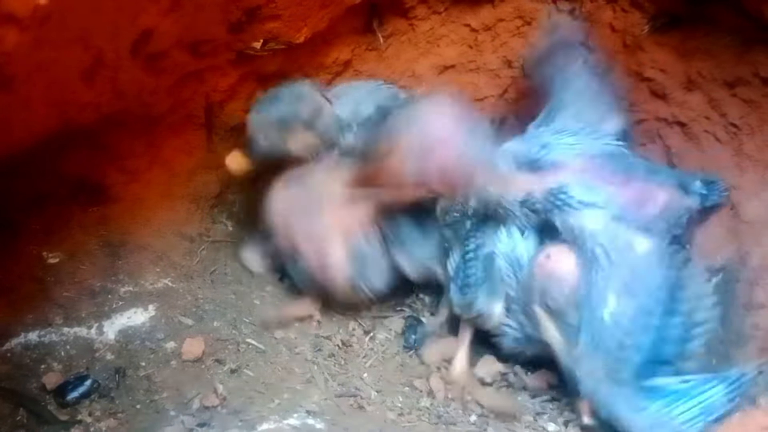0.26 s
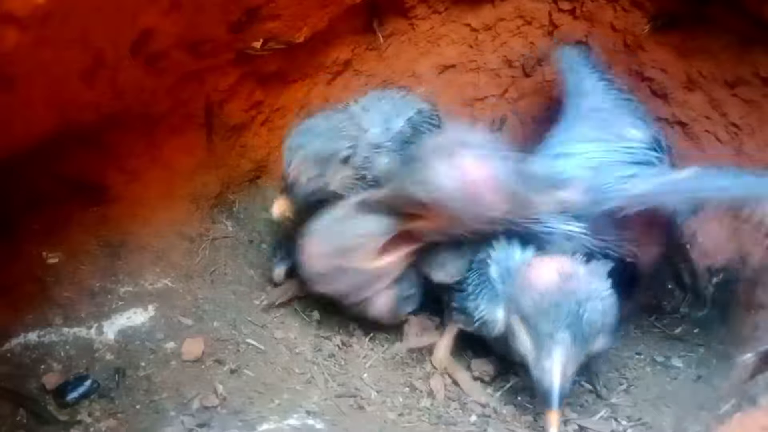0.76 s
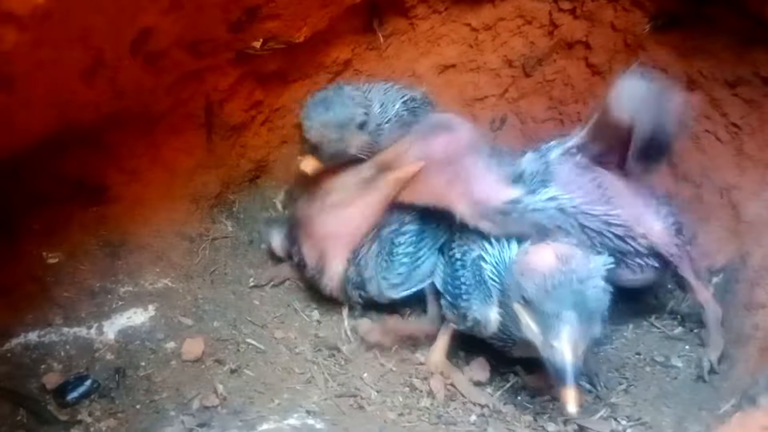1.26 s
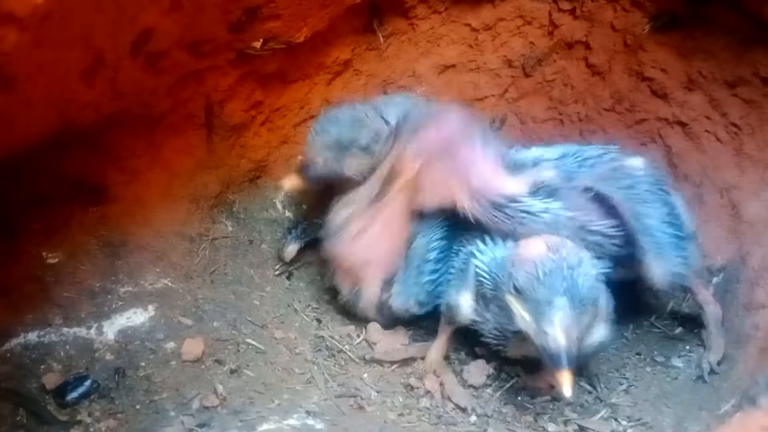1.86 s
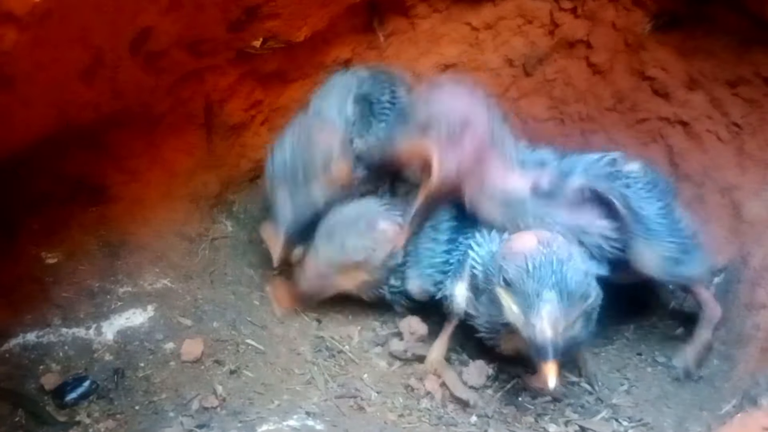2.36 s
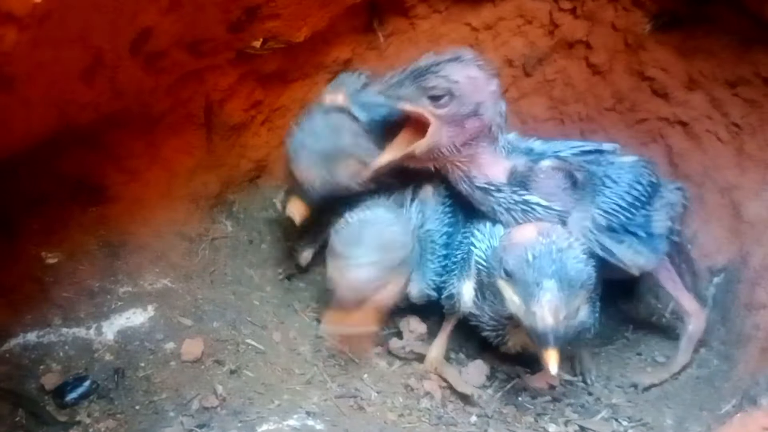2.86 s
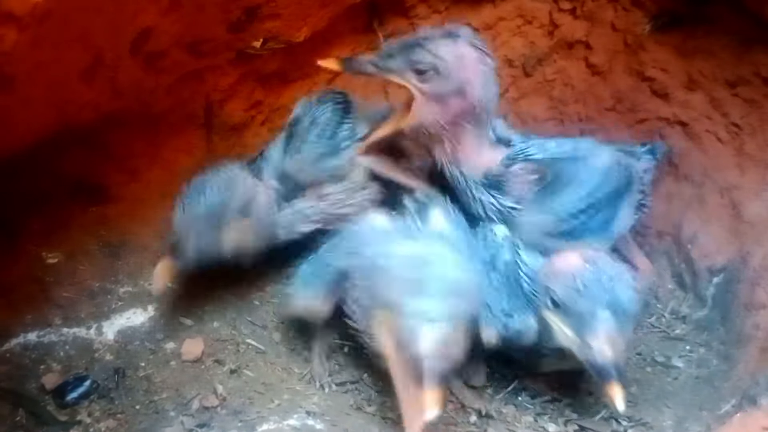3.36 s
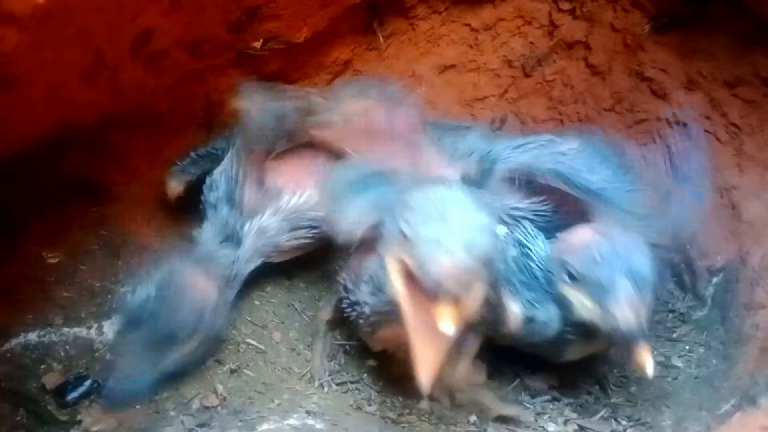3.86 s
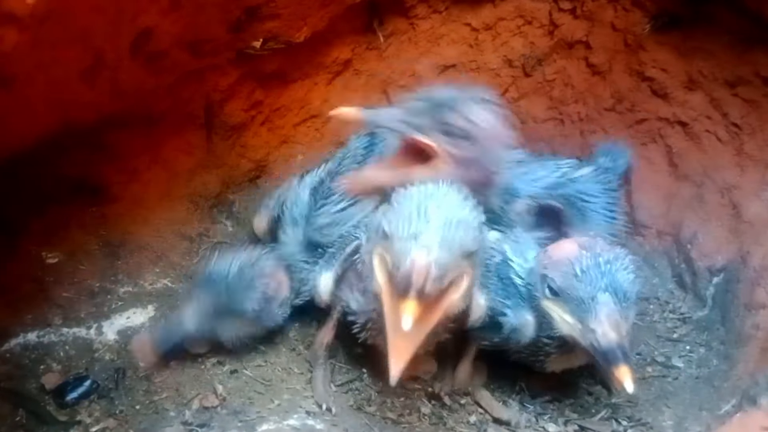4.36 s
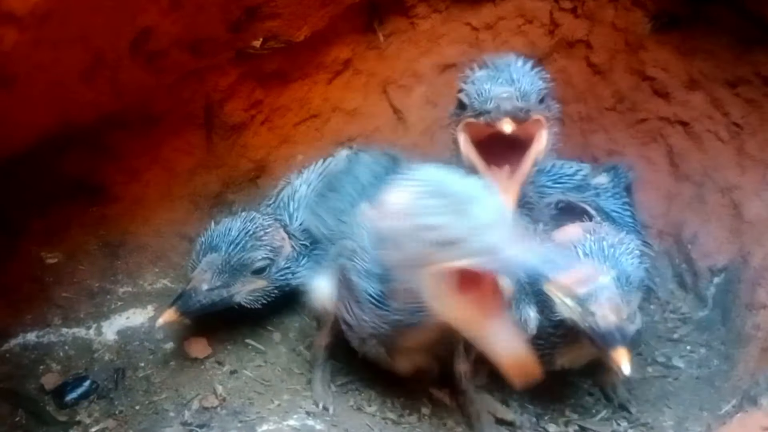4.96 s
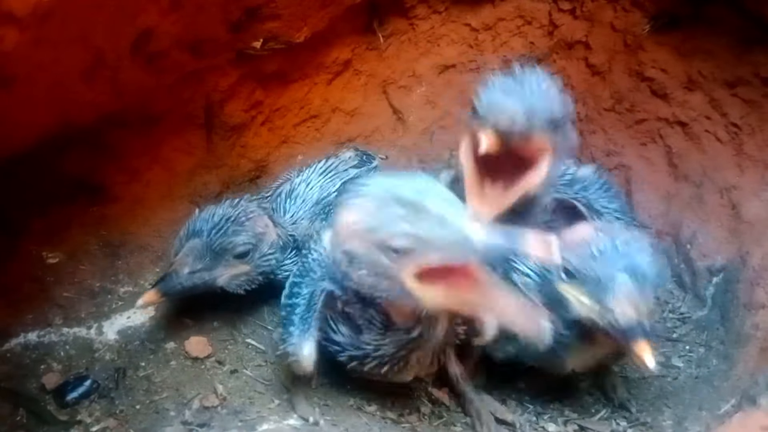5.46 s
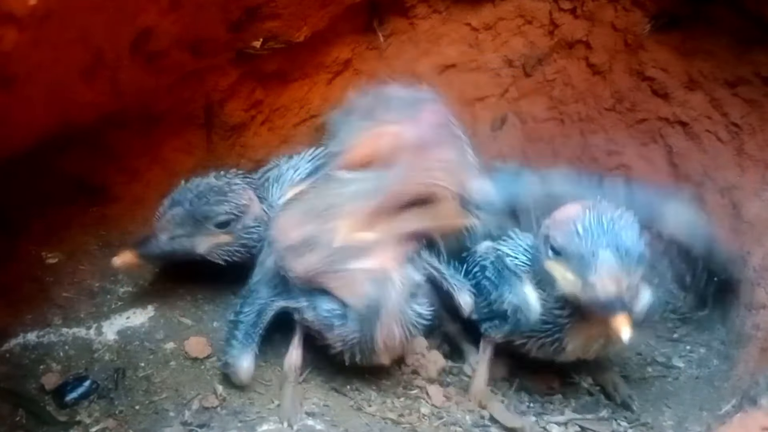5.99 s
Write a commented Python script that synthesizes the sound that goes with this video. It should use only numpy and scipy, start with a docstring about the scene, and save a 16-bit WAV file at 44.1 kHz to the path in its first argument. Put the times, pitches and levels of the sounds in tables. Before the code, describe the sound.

A close microphone in a dry little earth hollow catches jostling nestlings calling without rest, about three calls per second. Every call scoops up quickly to a high, buzzy whistle, wavers, and drops off abruptly. Some are cleaner and louder, others break into rasping, two-toned screeches around the middle and at the end. Very faint low rustling lies beneath; there is hardly any bass or reverberation.

```python
"""In an earthen burrow nestlings beg at close range: twenty harsh calls with short pauses between them.
In each call the syrinx, a self-oscillating valve, whistles near 3 kHz and breaks in and out of chaotic flutter.
Air forced past it is turbulent: it rasps in the resonances of throat and mouth and hisses in those of the beak.
The soft walls add only a few early echoes and a very short tail; a faint low rustle lies under the calls."""
import sys
import numpy as np
from scipy import signal
from scipy.fft import rfft, irfft
from scipy.io import wavfile
from scipy.ndimage import uniform_filter1d, map_coordinates

SR = 44100
rng = np.random.default_rng(int(sys.argv[2]) if len(sys.argv) > 2 else 0)


def digitize_waveform(pressure):
    """Quantize a signal to 16-bit integers and store it at the path in sys.argv[1].

    Rows of a 2-D input are taken as channels; values are limited to [-1, 1].
    """
    field = np.atleast_2d(pressure).T
    bounded = np.clip(field, -1, 1)
    quanta = np.round(bounded * 32767).astype(np.int16)
    wavfile.write(sys.argv[1], SR, quanta)


N = 274743

# higher resonances of windpipe and mouth: centre_hz, width_hz (of one pass), relative_level_db
MOUTH_MODES = [(1964, 332, 7), (2328, 98, 9), (3100, 298, 11), (3380, 170, -0.5), (4250, 1100, 2)]


def undb(db):
    """Amplitude gain is ten to the power of the decibels over twenty."""
    return 10 ** (np.asarray(db) / 20)


def unit(x):
    """Normalization: the mean power becomes 1."""
    return x / np.sqrt(np.mean(np.abs(x) ** 2))


def wander(count, hz):
    """Low-pass noise: random motion with a spread of 1, mostly slower than hz; count is at most one second."""
    f = np.fft.rfftfreq(SR, 1 / SR)
    # the Gaussian leaves nothing much faster
    shape = np.exp(-(f / hz / 4) ** 2) / (1 + (f / hz) ** 2)
    return unit(irfft(rfft(rng.standard_normal(SR)) * shape, SR))[:count]


def high_pass(x, hz):
    """Fourth-order Butterworth filter: steep loss below the corner."""
    return signal.sosfilt(signal.butter(4, hz, "high", fs=SR, output="sos"), x)


def add(out, sound, start_s):
    """Superposition: mix a sound in at a time."""
    start = max(int(start_s * SR), 0)
    out[start:start + len(sound)] += sound[:N - start]


def rustle(birds, rustle_db=-61, floor_db=-91, corner_hz=200):
    """Band-limited noise: a faint low rustle follows the rms of the calls, over a very quiet background."""
    effort = np.sqrt(np.abs(uniform_filter1d(birds ** 2, size=2000)))
    band = signal.butter(1, [corner_hz / 2, corner_hz * 2], "band", fs=SR, output="sos")
    noise = unit(signal.sosfilt(band, rng.standard_normal(N)))
    return noise * (undb(rustle_db) * effort + undb(floor_db))


def burrow(x, t60_s=0.058, wet_db=-33, count=4096):
    """Reverberation by convolution with decaying noise: bare earth swallows the sound almost at once."""
    decay = undb(-60 * np.arange(count) / SR / t60_s)
    tail = unit(rng.standard_normal(count) * decay) / np.sqrt(count)
    return x + undb(wet_db) * signal.fftconvolve(x, tail)[:N]


def walls(x, echo=0.53, nearest_s=0.000615, farthest_s=.004, sway_s=.00003, count=3):
    """Comb filtering: early echoes off earth and siblings interfere differently as the head moves."""
    n, out = np.arange(len(x)), x
    for lag_s in rng.uniform(nearest_s, farthest_s, count):
        moving_lag_s = lag_s + sway_s * wander(len(x), 3.9)
        out = out + echo * map_coordinates(x, [n - SR * moving_lag_s], order=3)
    return out / np.sqrt(1 + count * echo ** 2)


def resonate(x, modes, lowest_hz=480):
    """Parallel resonances, each applied twice so that the valleys stay dark; the small beak radiates few lows."""
    f = np.fft.rfftfreq(SR, 1 / SR) + 1e-3  # kept off zero for the divisions
    power = 0
    for hz, width_hz, db in modes:
        detuning = (f * f - hz * hz) / (f * width_hz)
        power = power + undb(db) ** 2 / (1 + detuning ** 2) ** 2
    radiation = 1 / np.sqrt(1 + (lowest_hz / f) ** 6)
    return irfft(rfft(x, SR) * np.sqrt(power) * radiation, SR)[:len(x)]


def catch(gain_db, count=512):
    """Impulsive excitation: the throat snaps shut with a crack in the mouth resonances and a faint dull thud."""
    t = np.arange(count) / SR
    crack = resonate(rng.standard_normal(count), MOUTH_MODES) * np.exp(-t / .002)
    thud = .06 * np.exp(-t / .0006)
    return undb(gain_db) * (2 * crack + thud)


def gullet(length_s, hz, gain_db, width_hz=160):
    """Noise-driven resonance: air rasps in the deep cavity while the gullet opens and closes."""
    count = int(length_s * SR)
    noise = unit(resonate(rng.standard_normal(count), [(hz, width_hz, 0)]))
    return noise * np.hanning(count) * undb(gain_db)


def stretch(x, ratio):
    """Time warping: a moving read speed slides all resonances of a noise by the same ratio."""
    return map_coordinates(x, [np.cumsum(ratio)], order=3, mode="mirror")


def turbulence(flow, modes, shift, uneven_db=2.5, uneven_hz=7):
    """Puffs of turbulent air ring sliding resonances; each waxes and wanes as the neck moves."""
    count = len(flow)
    air = 0
    for mode in modes:
        gain = undb(uneven_db * wander(count, uneven_hz))
        air = air + gain * resonate(flow * rng.standard_normal(count), [mode])
    return unit(stretch(air, shift))


def throat_rasp(flow, lowest_db, second_db):
    """Low formants: turbulence rings the two low resonances of the throat."""
    # the two low resonances: centre_hz, width_hz (of one pass)
    throat_modes = [(825, 122), (1350, 103)]
    air = 0
    for mode, db in zip(throat_modes, (lowest_db, second_db)):
        shift = 1 + .025 * wander(len(flow), 9)
        air = air + turbulence(flow, [(*mode, 0)], shift) * undb(db)
    return air


def mouth_rasp(flow):
    """Higher formants: turbulence rings the resonances of windpipe and mouth."""
    return turbulence(flow, MOUTH_MODES, 1 + .014 * wander(len(flow), 9.0))


def beak_hiss(flow, hz):
    """Cavity tuning: the beak gapes wider for a higher pitch, which lifts its resonances."""
    # resonances of the open beak: centre_hz, width_hz (of one pass), relative_level_db
    beak_modes = [(5172, 290, 3.5), (5746, 250, -2.5), (7000, 610, -0.5), (7480, 500, 0), (8110, 300, -3),
                  (8686, 720, -2.5), (9690, 460, -9.5), (12800, 1300, -33)]
    return turbulence(flow, beak_modes, (hz / np.mean(hz)) ** .5, uneven_db=3.0, uneven_hz=9)


def thin_band(x, depth, centre_hz=4900, width_hz=500):
    """Band-stop filter: thins the sound around a centre frequency, by a depth that changes over time."""
    f = np.fft.rfftfreq(SR, 1 / SR)
    band = np.exp(-((f - centre_hz) / width_hz) ** 4)
    return x - depth * irfft(rfft(x, SR) * band, SR)[:len(x)]


def swell(since, left, attack_s, release_s):
    """Linear envelope: pressure builds at the start of a call and drops at its end."""
    return np.clip(since / attack_s, 0, 1) * np.clip(left / release_s, 0, 1)


def wobble(t):
    """Modulation by smooth bumps: the voice of a jostled chick bends in pitch and level and recovers."""
    # wobbles: centre_s, length_s, pitch_bend_hz, whistle_change_db, hiss_change_db
    wobbles = [(0.049, 0.057, -44.5, -4.5, -1.5), (0.136, 0.048, 32, 4, 0.5), (0.292, 0.097, -16.5, 8.5, 7),
               (0.357, 0.0896, 45.5, 7.5, 2.5), (0.636, 0.075, -80.0, -9, 0.5), (0.706, 0.11, 191, 4.5, -4),
               (1.065, 0.055, -220.0, -4, -3.5), (1.091, 0.029, 79, 5, -5), (1.147, 0.16, -91.5, 3.0, -1.5),
               (1.414, 0.0767, 88, -9.5, 10), (1.606, 0.1256, -48, 6, 2.0), (1.817, 0.13, -190.0, 2.0, 2.5),
               (2.183, 0.0926, 100.0, 5, 5.5), (2.26, 0.09, -200.0, 4.5, -7),
               (2.495, 0.0334, 183, 1.0, -1.0), (2.554, 0.05, -350.0, -6.5, -1.5),
               (2.577, 0.05, 265.5, -0.5, -3.0), (2.729, 0.0407, 209, 1.0, 3.5),
               (2.913, 0.045, -300.0, -11, -2.5), (3.114, 0.0617, 68.5, -6.5, -2.5),
               (3.187, 0.12, -160.0, 7.0, -6), (3.475, 0.0474, -160.0, -6.0, 2.5),
               (3.502, 0.0356, 184, 2, -4), (3.72, 0.029, 69.5, 4, -1.5), (3.765, 0.135, -240.0, 0, -3),
               (3.79, 0.024, 41, 6.5, -4), (3.845, 0.03, -200.0, 10.5, -6.5), (3.955, 0.022, 76, 12.5, -5),
               (4.186, 0.097, 20.5, -7, 0), (4.439, 0.053, -250, -3.5, -3),
               (4.698, 0.0452, -220, -3.5, -1.5), (5.211, 0.0958, -140.0, 0.5, -5),
               (5.937, 0.048, 22, 3.5, 4.5), (6.015, 0.11, -160, -12.5, 2)]
    centre_s, length_s, *changes = np.transpose(wobbles)
    position = (t - centre_s[:, None]) / length_s[:, None]
    bumps = np.cos(np.pi * np.clip(position, -.5, .5)) ** 2
    return np.array(changes) @ bumps


def second_voice(t):
    """Two-source voice: in a screech the other side of the syrinx swells and fades; gives its share and pitch."""
    # screeches: start_s, end_s, pitch_hz
    screeches = [(3.128, 3.165, 3745), (3.795, 3.836, 3540), (3.864, 3.949, 3447), (6.062, 6.17, 3550)]
    share, hz = np.zeros(len(t)), np.zeros(len(t))
    for start_s, end_s, pitch_hz in screeches:
        inside = (t > start_s) & (t < end_s)
        share += inside * np.abs(np.sin(np.pi * (t - start_s) / (end_s - start_s))) ** .5
        hz += inside * pitch_hz
    return share, hz


def phasor(hz, jitter_hz, quiver_hz):
    """Frequency modulation: a rotating vector whose pitch quivers at random."""
    quivering_hz = hz + jitter_hz * wander(len(hz), quiver_hz)
    return np.exp(2j * np.pi * np.cumsum(quivering_hz) / SR)


def syrinx(hz, rough, chaos_hz=380, squeeze=0.024):
    """Self-oscillation as a rotating vector: growing roughness breaks the whistle into chaotic flutter."""
    count = len(hz)
    share = np.clip(1.15 * rough, .05, 1)
    chaos = (wander(count, chaos_hz) + 1j * wander(count, chaos_hz)) / np.sqrt(2)
    swing = np.sqrt(1 - share) + np.sqrt(share) * chaos
    # the membranes can only swing so far
    swing = unit(swing / np.sqrt(1 + squeeze * np.abs(swing) ** 2))
    return swing * phasor(hz, jitter_hz=55.0, quiver_hz=155.6)


def puffs(swing, chop=0.51, rattle_db=2.0, rattle_hz=170):
    """Valve-modulated flow: air escapes once a membrane cycle, in the uneven spurts of a fast rattle."""
    return np.maximum(1 + chop * swing.real, 0) * undb(rattle_db * wander(len(swing), rattle_hz))


def call(start_s, end_s, pitch_hz, rise_hz, whistle_db, rise_db, roughness, air_db, air_rise_db, rasp_db,
         lowest_db, second_db, scoop_hz=400, fall_hz=900, hiss_trim_db=-3, rasp_trim_db=1.0, rough_rasp_db=9,
         throat_trim_db=-1, octave_db=-3.0):
    """Source and filter: the syrinx gives whistle and octave, and its air puffs drive throat, mouth and beak."""
    t = np.arange(int(start_s * SR), int(end_s * SR)) / SR
    count = len(t)
    # the first call is already under way and the last one goes on: a second added skips onset or ending
    since = t - t[0] + (start_s < .1)
    left = t[-1] - t + (end_s > N / SR - .1)

    # pitch and levels ramp through the call, bent by the wobbles
    along = np.linspace(-.5, .5, count)
    bend_hz, change_db, hiss_change_db = wobble(t)
    push_db = rise_db * along + change_db
    # the pitch is never quite steady
    hz = pitch_hz + rise_hz * along + bend_hz + 22.35 * wander(count, 14.1)
    # the whistle starts 13 dB weak and gathers strength
    level_db = whistle_db + push_db - 13 * np.exp(-since / 0.029)
    # the hiss gains from the beak, which gapes widest mid-call
    hiss_db = air_db + air_rise_db * along + hiss_change_db - 2.5 * (2 * along) ** 2

    # the whistle is cleanest where it is strongest; screeches and the closing throat roughen it
    screech, high_hz = second_voice(t)
    closing = np.exp(-left / .01)
    rough = np.clip(roughness - 0.03 * push_db + .25 * screech + 0.48 * closing, 0, 1)
    # a rough voice also staggers in pitch and level
    hz = hz + 130 * rough * wander(count, 29)
    stagger_db = 6.5 * rough * wander(count, 29)
    # the pitch scoops up as pressure builds and drops steeply as it goes
    hz = hz - scoop_hz * np.exp(-since / .014) - fall_hz * np.exp(-left / 0.0099)

    # in a screech the two voices beat against each other and the higher one owns the octave
    swing = syrinx(hz, rough)
    high = phasor(high_hz, jitter_hz=166.0, quiver_hz=130.6)
    mix = .4 * screech
    voices = np.sqrt(1 - mix) * swing + np.sqrt(mix) * high
    whistle = np.sqrt(2) * voices.real * undb(level_db + stagger_db)
    # squaring a rotating vector doubles its frequency
    doubled = (1 - screech) * swing ** 2 / np.abs(swing) + screech * high ** 2
    octave = unit(doubled.real) * undb(hiss_db + octave_db)

    flow = puffs(swing)
    hiss = beak_hiss(flow, hz) * undb(hiss_db + hiss_trim_db)
    # the throat narrows through each call, so its rasp grows
    narrow_db = 3.5 * along
    # the rasp grows with the whistle, the air flow and the roughness
    follow_db = 0.76 * level_db + (1 - 0.76) * hiss_db + rough_rasp_db * rough
    rasp = mouth_rasp(flow) * undb(follow_db + narrow_db + rasp_db + rasp_trim_db)
    # the low resonances take a share of the whistle's changes in level
    throat_db = 0.39 * (level_db - whistle_db) + narrow_db + throat_trim_db
    throat = throat_rasp(flow, lowest_db, second_db) * undb(throat_db)

    # the long waves of the throat bend around the siblings and gain no echoes
    air = walls(high_pass(octave, 3500) + hiss + rasp) + throat
    # the air builds and drops faster than the whistle, and begins 15.5 dB weak
    air = air * swell(since, left, attack_s=0.007, release_s=0.011)
    air = air * undb(-15.5 * np.exp(-since / 0.017))
    # the windpipe blocks the flutter far below the whistle
    whistle = high_pass(high_pass(whistle, 1900), 1900)
    whistle = whistle * swell(since, left, attack_s=0.02, release_s=0.025)

    # the band near 4.9 kHz is thinnest when the hiss is weak beside the whistle
    depth = np.clip((level_db - hiss_db) / 16, .7, .97)
    voice = thin_band(whistle + air, depth)
    # a wider band near 4.9 kHz also thins when the hiss drops
    wide_depth = np.clip(-hiss_change_db / 9.5, 0, .9)
    return thin_band(voice, wide_depth, centre_hz=4920, width_hz=970)


def scene():
    """Superposition in the burrow: calls, wide gapes and catches of the throat, with reverberation and rustle."""
    # begging calls; pitch and levels are mid-call bases, each rise runs from start to end:
    # start_s, end_s, pitch_hz, pitch_rise_hz, whistle_db, whistle_rise_db, base roughness (0-1),
    # air_db (base of hiss and octave), air_rise_db, rasp_db (offset from the level it follows),
    # lowest_throat_db, second_throat_db (both before the throat trim)
    begging_calls = [(0.0, 0.164, 3015, 35, -17.5, -5, 0, -32, -1.0, -8.5, -41.5, -41),
                     (0.215, 0.499, 2997, -33, -23, 6.5, 0.3, -36, 4, -7, -43.5, -44),
                     (0.545, 0.879, 3024, -190.0, -18.5, 10.5, 0, -38, 7.0, -11, -48.0, -54),
                     (0.931, 1.261, 3070, -190.0, -22, -3, 0.24, -37.5, 1.5, -10, -47, -44.5),
                     (1.324, 1.676, 3106, -160.0, -20.0, -0.5, 0.21, -41.5, 9.0, -9, -45.5, -43.5),
                     (1.739, 2.019, 3196, 100.0, -19.5, -3.5, 0.25, -38.0, 3.5, -13, -46.5, -43.5),
                     (2.08, 2.335, 3090, -63, -19.0, 8.0, 0.17, -34, 1.5, -7.5, -43, -46.5),
                     (2.382, 2.615, 3230, -58, -23.5, 7, 0.22, -36, 11.5, -12.5, -44.5, -50.5),
                     (2.659, 2.979, 3272, -57, -18, 3.5, 0.11, -34.0, -1, -13.5, -41.5, -43.5),
                     (3.024, 3.263, 3187, -180.0, -22, 4.0, 0.06, -35.0, 1.5, -9, -46.5, -37.5),
                     (3.323, 3.544, 3185, -150.0, -16, 9.0, 0.03, -36, 3, -14, -42.0, -45.5),
                     (3.598, 3.97, 3108, 100.5, -17.0, -0.5, 0.31, -34.5, 6.5, -16, -46.0, -37.5),
                     (4.024, 4.24, 3180.0, -92, -14, 10.5, 0.06, -38, -4.5, -11.5, -43, -43),
                     (4.286, 4.502, 3210, 155.5, -22.5, -8, 0.36, -34, -1.5, -15, -41.5, -56),
                     (4.549, 4.773, 3166, -50.5, -18, -0.5, 0.05, -43.5, 2, -11, -48.5, -53),
                     (4.806, 5.026, 3132, -180.0, -18, 20, 0.23, -35, 3, -16.5, -45.0, -57.5),
                     (5.065, 5.301, 3072, -140.0, -17, 8.5, 0.12, -31.5, 5.5, -14, -43.5, -72),
                     (5.353, 5.599, 3126, 1, -17, 1.5, 0.15, -31.5, 2.5, -14, -42.5, -63),
                     (5.647, 5.84, 2985, 557, -20.5, -5, 0.28, -36.5, 14, -17, -53.5, -59.5),
                     (5.895, 6.234, 3133, 379.5, -18.5, 3.5, 0.17, -39, 8.5, -13, -44.0, -49.5)]
    # wide gapes, which open a still deeper resonance in the gullet: centre_s, length_s, pitch_hz, gain_db
    wide_gapes = [(2.497, .08, 680, -44.5), (3.145, .09, 620, -51), (3.408, .1, 690, -48.5),
                  (4.41, .12, 650, -46), (4.916, .12, 690, -48), (5.153, .14, 660, -46.5),
                  (5.765, .12, 550, -54), (6.023, .16, 610, -45)]
    # sharp catches of the throat: start_s, gain_db
    throat_catches = [(4.225, -20.5), (4.236, -35), (4.493, -25.5), (5.297, -41)]
    birds = np.zeros(N)
    for row in begging_calls:
        add(birds, call(*row), row[0])
    for centre_s, length_s, hz, gain_db in wide_gapes:
        add(birds, gullet(length_s, hz, gain_db), centre_s - length_s / 2)
    # such small bodies radiate almost no bass
    birds = high_pass(birds, 330)
    for start_s, gain_db in throat_catches:
        add(birds, catch(gain_db), start_s)
    fade = np.minimum(np.arange(N)[::-1] / (.004 * SR), 1)
    return ((burrow(birds) + rustle(birds)) * fade)[None]


def record(dry, top_hz=15600):
    """Elliptic low-pass filter: a steep cut removes the top of the spectrum."""
    return signal.sosfilt(signal.ellip(8, .2, 70, top_hz, fs=SR, output="sos"), dry)


dry = scene()
out = record(dry)
digitize_waveform(out)
```